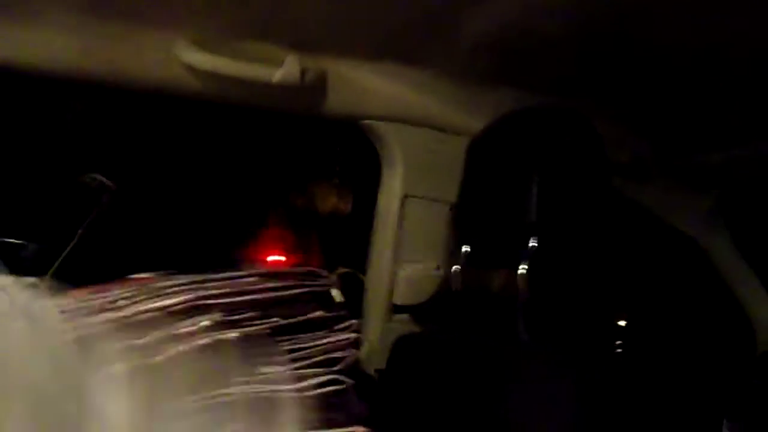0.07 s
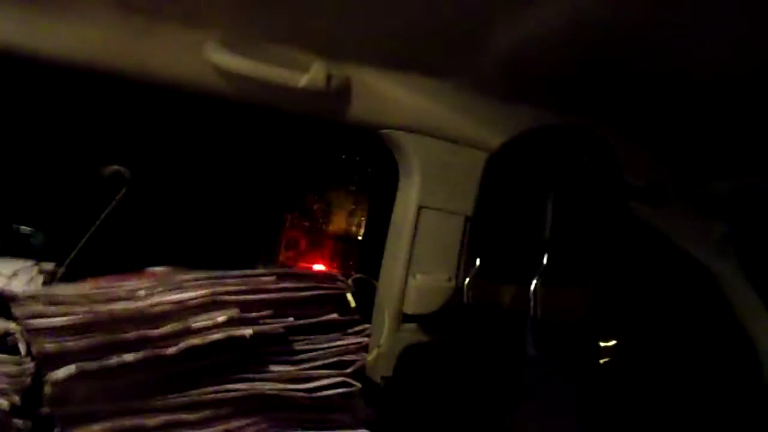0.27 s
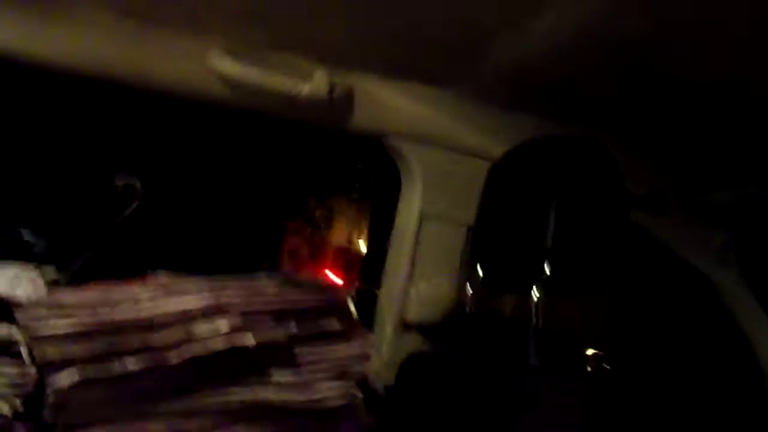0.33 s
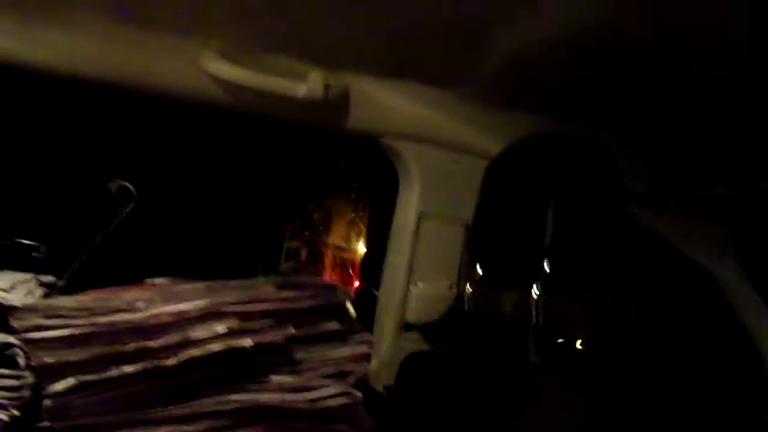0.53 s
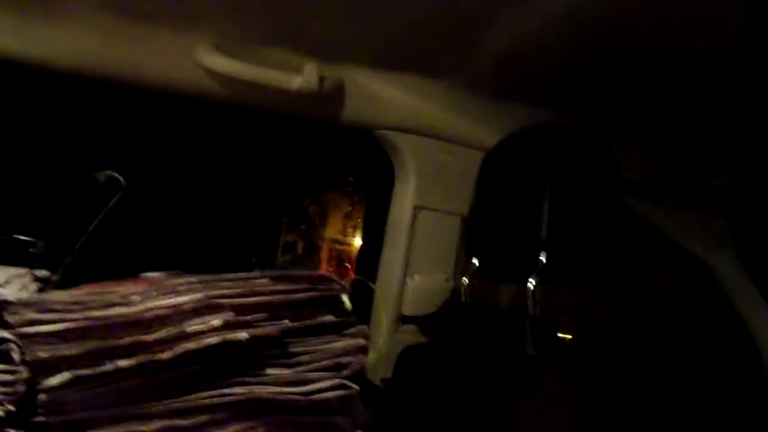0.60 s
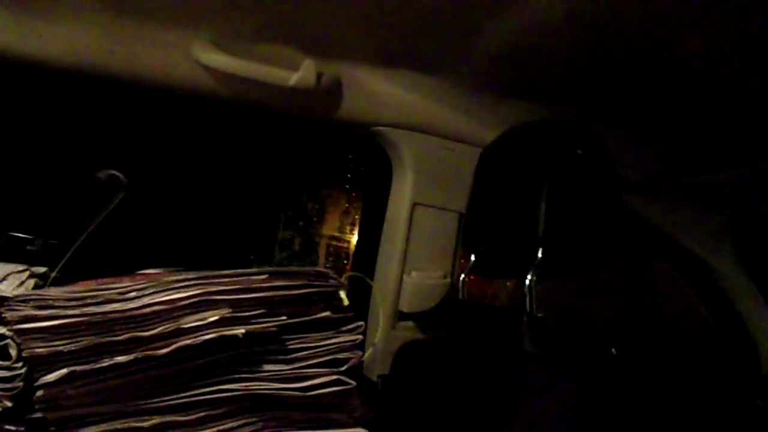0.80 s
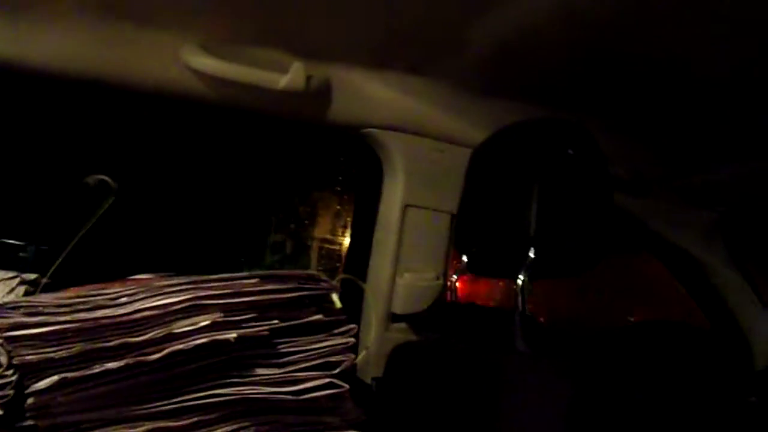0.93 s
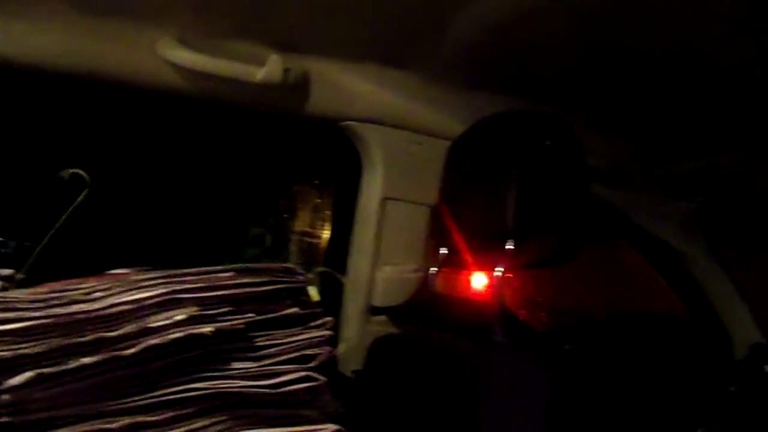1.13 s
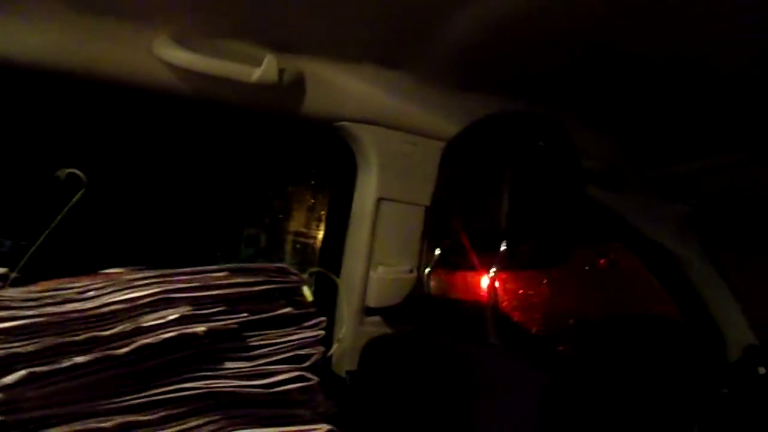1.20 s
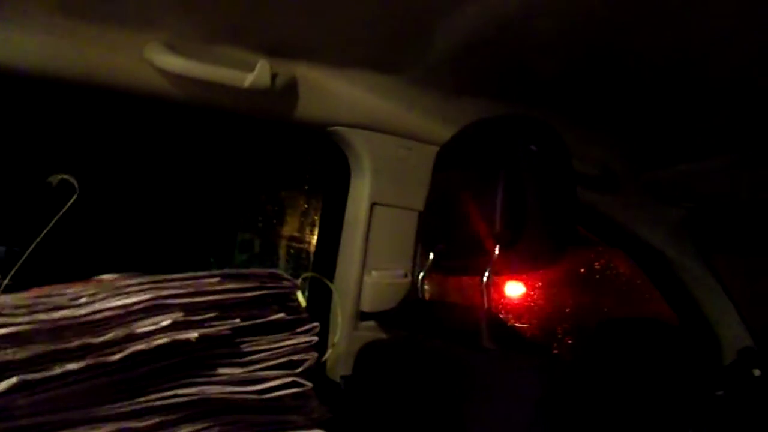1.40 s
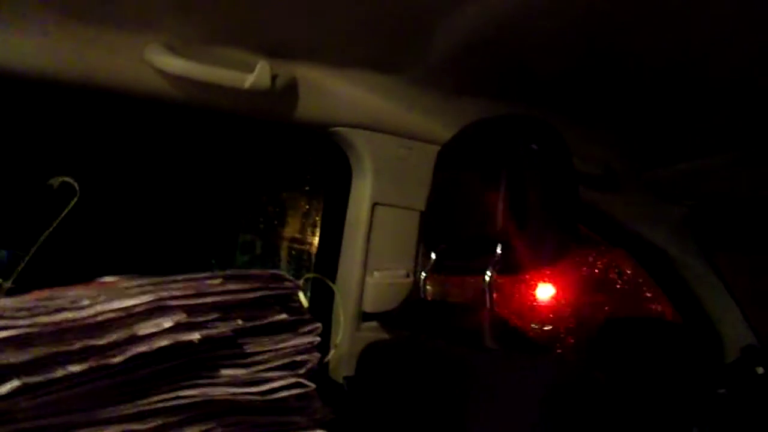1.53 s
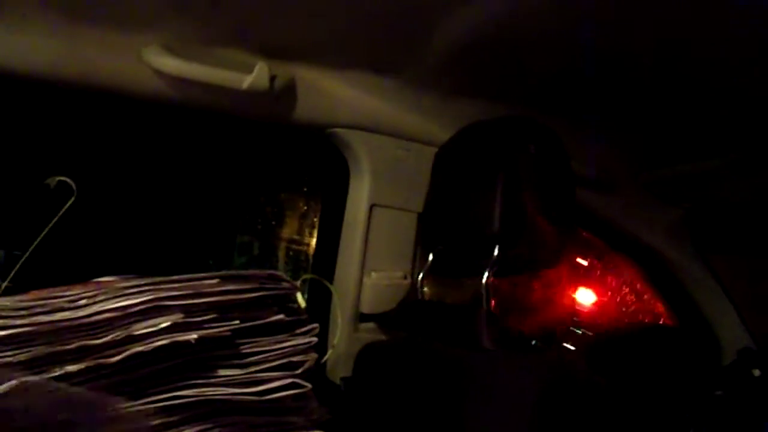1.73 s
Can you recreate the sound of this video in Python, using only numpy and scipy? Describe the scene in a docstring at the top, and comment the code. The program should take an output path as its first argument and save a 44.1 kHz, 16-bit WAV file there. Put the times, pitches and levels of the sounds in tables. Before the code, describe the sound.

Newspapers slap onto a stack, then rustle softly over a faint idling engine.

```python
"""A bundle of newspapers is slapped onto a stack: it skids over the top sheet, cracks down and settles.
Sheets then slide, crinkle and swish, and their folds snap; bending waves in paper carry the treble
first, so every snap is a tiny falling chirp. Underneath, the vehicle's idling engine drones through
the small padded cabin."""
import sys
import numpy as np
from scipy import signal
from scipy.fft import rfft, irfft, next_fast_len
from scipy.io import wavfile
from scipy.ndimage import map_coordinates

SR = 44100
rng = np.random.default_rng(int(sys.argv[2]) if len(sys.argv) > 2 else 0)


def file_out(sig):
    """Save sig as 16-bit WAV at sys.argv[1]."""
    # one column per channel
    cols = np.atleast_2d(sig).T
    # limit, then scale
    lim = np.clip(cols, -1, 1)
    pcm = np.round(lim * 32767).astype(np.int16)
    wavfile.write(sys.argv[1], SR, pcm)


N = 77175
TOP_HZ = 16300  # band limit


def amp(db):
    """Decibels to gain."""
    return 10 ** (np.asarray(db) / 20)


def unit(x):
    """Scale to rms 1."""
    return x / np.sqrt(np.mean(x ** 2) + 1e-20)


def along(points, hz):
    """Read a curve of (f/Hz, value) points on a log frequency axis."""
    f, values = np.transpose(points)
    return np.interp(np.log(hz + 1), np.log(f + 1), values)


def wobble(knots_per_s):
    """A smooth random modulator."""
    return map_coordinates(rng.standard_normal(4096), [np.arange(N) * knots_per_s / SR + 2], mode="wrap")


def equalise(x, eq):
    """Minimum-phase EQ through (f/Hz, gain/dB) points."""
    size = 2 ** 17
    cepstrum = irfft(np.log(amp(along(eq, np.fft.rfftfreq(size, 1 / SR)))))
    cepstrum[1:size // 2] *= 2
    cepstrum[size // 2 + 1:] = 0
    return irfft(rfft(x, size) * np.exp(rfft(cepstrum)))[:N]


def noise(eq):
    """Coloured noise of rms 1."""
    return unit(equalise(rng.standard_normal(N), eq))


# low engine bed and the airy hiss above it: f/Hz, gain/dB
DRONE_EQ = [(20, -37.5), (38, -19.5), (52, -5), (75, -3.5), (130, -4), (200, -11.5), (300, -16.5),
            (600, -22.5), (1200, -42), (3000, -52.5)]
HISS_EQ = [(350, -27), (550, -8.5), (720, -9), (1100, -11.5), (2200, -13), (3500, -14.5), (6500, -21),
           (7800, -19.5), (11000, -18.5), (16000, -26.5)]
# engine and cabin tones: f/Hz, level/dB, level swing/dB, phase swing/rad
HUM_TONES = [(75, -61, 4.5, .9), (107, -59, 4.5, .8), (145, -63.5, 6, 1.2), (241, -62.5, .8, .25)]

def idling_vehicle(whine_hz=7800):
    """The engine drones and hums with wavering tones, under a faint hiss and a narrow whine."""
    t = np.arange(N) / SR
    hum = 0
    for hz, db, swing_db, swing_rad in HUM_TONES:
        swell = amp(swing_db * wobble(11.15))
        phase = 2 * np.pi * hz * t + swing_rad * wobble(7.4)
        hum += amp(db) * unit(swell * np.cos(phase))
    whine = noise([(whine_hz * .93, -60), (whine_hz * .99, 0),
                   (whine_hz * 1.01, 0), (whine_hz * 1.07, -60)])
    return hum + amp(-55) * noise(DRONE_EQ) + amp(-63) * noise(HISS_EQ) + amp(-72) * whine


# decay of the padded cabin: f/Hz, T60/s
CABIN_DECAY = [(200, .12), (1000, 0.036), (4000, 0.083), (14000, 0.036)]

def cabin_tail(early_t60_s=.018, late_db=-7.5):
    """Dense echoes off the near roof and door, then a short padded decay; energy 1."""
    hz, frame_s, spectra = signal.stft(rng.standard_normal(SR // 5), SR, nperseg=128)
    decay = amp(-60 * frame_s / along(CABIN_DECAY, hz)[:, None])
    late = signal.istft(spectra * decay, SR, nperseg=128)[1]
    t = np.arange(len(late)) / SR
    early = rng.standard_normal(len(t)) * amp(-60 * t / early_t60_s)
    tail = (unit(early) + amp(late_db) * unit(late)) * (t > .0007)  # gap before the first echo
    return tail / np.linalg.norm(tail)


# narrow air resonances: f/Hz, width/Hz, gain/dB
AIR_MODES = [(480, 45, -3), (718, 37, 1), (1157, 37, -4), (1720, 26, -9.5), (2510, 89.2, -9.5),
             (3014, 48, -6.5)]

def hollows(paper):
    """Hollows between the stack, door and roof ring along with the paper."""
    size = next_fast_len(N + SR // 2)
    f = np.fft.rfftfreq(size, 1 / SR)
    ring = sum(amp(db) * 1j * f * width / (hz * hz - f * f + 1j * f * width)
               for hz, width, db in AIR_MODES)
    return irfft(rfft(paper, size) * (1 + ring), size)[:N]


def rubbing(strokes, eq, grains_per_s, grain_db, flutter_db):
    """Paper on paper: fine hiss with catching fibres. Strokes rise, hold, then fall 60 dB per release."""
    t = np.arange(N) / SR
    power = 0
    for start, end, db, attack, release in strokes:
        rise = np.clip((t - start) / attack, 0, 1)
        fall_db = 60 * np.maximum(t - end, 0) / release
        power += (rise * amp(db - fall_db)) ** 2
    catches = (rng.random(N) < grains_per_s / SR) * rng.standard_normal(N)
    friction = rng.standard_normal(N) + amp(grain_db) * unit(catches)
    flutter = amp(flutter_db * wobble(90))
    return unit(equalise(friction, eq)) * np.sqrt(power) * flutter


# light brushes: start/s, end/s, level/dB, attack/s, release/s
SWISH_STROKES = [(.125, .175, -56, 0.017, 0.18), (1.17, 1.2, -63, .004, .1), (1.3, 1.46, -63.5, 0.039, .35),
                 (1.545, 1.62, -60.5, 0.0062, .2), (1.712, 1.75, -55.5, .006, .1)]
# all air, no body: f/Hz, gain/dB
SWISH_EQ = [(1500, -25.5), (4000, -2.5), (6500, 0.5), (9000, 0.5), (13000, -3.5), (16000, -8)]

def swishes():
    """Single sheets brush past with an airy swish."""
    return rubbing(SWISH_STROKES, SWISH_EQ, grains_per_s=320, grain_db=-6, flutter_db=4.5)


# soft pushes: start/s, end/s, level/dB, attack/s, release/s
SHOVE_STROKES = [(.335, .39, -52.5, 0.016, 0.051), (.472, .484, -61, .005, 0.036),
                 (.64, .76, -60, 0.017, 0.092), (.765, .8, -57.5, 0.011, .04),
                 (.882, .91, -53, .003, 0.032)]
# muffled mids: f/Hz, gain/dB
SHOVE_EQ = [(60, -14), (250, -7), (480, -9.5), (600, 0), (750, 1.5), (950, -7), (1200, -0.5), (1800, -3),
            (4000, -53.5), (9000, -74.5)]

def shoves():
    """The stack gives with a soft, dull shove."""
    return rubbing(SHOVE_STROKES, SHOVE_EQ, grains_per_s=250, grain_db=-3, flutter_db=3.0)


# long, quiet rubs: start/s, end/s, level/dB, attack/s, release/s
SLIDE_STROKES = [(-.04, .2, -54, .12, 0.23), (.3, .6, -53, 0.018, 0.77), (.58, .885, -54, 0.039, 0.26),
                 (1.17, 1.28, -51.5, 0.052, .12), (1.28, 1.42, -57.5, 0.026, 0.5),
                 (1.55, 1.75, -57, 0.012, .1), (1.645, 1.72, -51.5, 0.0052, 0.22)]
# broad, papery mids: f/Hz, gain/dB
SLIDE_EQ = [(150, -21), (400, 1.5), (750, -2.5), (1000, -2), (1500, 1.5), (3000, 0.5), (4500, 0),
            (5500, -6.5), (9000, -6), (12000, -14), (16000, -17)]

def slides():
    """Sheets slide over each other with a smooth hiss."""
    return rubbing(SLIDE_STROKES, SLIDE_EQ, grains_per_s=350, grain_db=-10, flutter_db=1.44)


# quick crunches: start/s, end/s, level/dB, attack/s, release/s
CRINKLE_STROKES = [(.827, .85, -44.5, 0.0015, 0.016), (.868, .87, -67, .001, 0.017),
                   (1.271, 1.279, -50, 0.0038, 0.14), (1.684, 1.691, -55, 0.0017, 0.036)]
# crisp presence: f/Hz, gain/dB
CRINKLE_EQ = [(150, -20), (450, -5.5), (750, -1), (1000, -4.5), (1500, -2.5), (3200, 1), (5000, -12.5),
              (9000, -3.5), (12000, -15), (16000, -20.5)]

def crinkles():
    """Sheets crumple briefly, more grain than hiss."""
    return rubbing(CRINKLE_STROKES, CRINKLE_EQ, grains_per_s=500, grain_db=3.5, flutter_db=-2.5)


def snap(at_s, db, centre_hz, octaves, travel_ms, skirt_db, room_db, ripple_db=1.5):
    """A click spreads into a falling chirp, as bending waves speed up with the root of frequency."""
    f = np.fft.rfftfreq(4096, 1 / SR) + 1
    octaves_off = np.log2(f / centre_hz)
    peak = np.exp(-.5 * (octaves_off / octaves) ** 2)
    skirt = amp(skirt_db) / (1 + ((octaves_off + .7) / 2) ** 4)  # duller body under the peak
    # every fold favours its own frequencies
    ripple = amp(ripple_db * map_coordinates(rng.standard_normal(64), [f / 450]))
    phase = 2 * np.pi * travel_ms / 1000 * (2 * np.sqrt(1000 * f) - f * np.sqrt(1000 / TOP_HZ))
    lead_samples = 64
    chirp = np.roll(irfft((peak + skirt) * ripple * np.exp(-1j * phase)), lead_samples)
    chirp *= amp(db) / np.abs(chirp).max()
    sound = amp(room_db) * signal.fftconvolve(chirp, cabin_tail())
    sound[:len(chirp)] += chirp
    return np.pad(sound, (max(round(at_s * SR) - lead_samples, 0), N))[:N]


# ticks and cracks of the folds, plus the bundle's treble crack at .2856 s: t/s, level/dB, f/Hz, width/octaves,
# travel time at 1 kHz/ms
FOLD_SNAPS = [(0.1296, -41, 3480, 1.5, 2.8), (.1365, -40.5, 1010, 1.2, 3), (0.167, -36, 3000, 0.73, 2.6),
              (.2322, -23.5, 3730, 0.51, 2.7), (.2642, -30, 12500, 0.33, 1.2),
              (.2856, -5.5, 10560, 0.15, 0.96), (0.2886, -10, 3050, .55, 2.22),
              (0.3009, -12.5, 9300, 0.26, 2.9), (.3012, -17, 4160, .5, 1.54),
              (0.302, -18.5, 2350, 0.74, 3.5), (0.3561, -36.5, 3950, 1.1, 3), (.4795, -41, 1170, 1.3, 5.4),
              (0.594, -36.5, 2340, 0.58, 3), (.609, -40.5, 4500, 1.2, 2), (.7645, -35, 4130, 0.47, 2.8),
              (0.7966, -24, 2780, 0.46, 4.7), (.7985, -30.5, 1270, 0.3, 2.4),
              (.8277, -31.5, 3460, 1.14, 3.1), (0.8414, -27.5, 2980, 0.51, 1.8),
              (0.8437, -30, 1520, 0.55, 3.4), (0.8486, -32.5, 2100, 0.36, 3.6),
              (0.8838, -31, 2160, 0.71, 4), (.9, -29, 3310, 1.3, 4), (1.0778, -44, 2280, 0.52, 2.8),
              (1.104, -50, 4930, 2.2, 2), (1.169, -48, 1500, 1, 3), (1.2271, -32, 3600, 0.58, 2),
              (1.2326, -18.5, 5280, 0.46, 2.5), (1.2329, -20.5, 13800, 0.31, 1),
              (1.2338, -24.5, 2240, 0.34, 1.85), (1.2519, -35, 3800, .5, 1.3),
              (1.2623, -34.5, 3400, 0.42, 1.8), (1.2719, -35.5, 4630, 0.98, 4.6),
              (1.275, -38.5, 1770, 1.5, 3.5), (1.542, -47.5, 2700, 0.49, 3.8),
              (1.571, -40, 3180, 1.25, 5.2), (1.647, -36, 3800, 1, 4), (1.6638, -31, 3750, 0.87, 3),
              (1.6835, -30.5, 2230, 0.97, 4), (1.6882, -31, 1610, 0.47, 2.4)]

def fold_snaps():
    """Folds snap, each with its own short cabin echo; among them, the loud narrow crack at .2856 s is the
    bundle's treble crack as it lands."""
    return sum(snap(*fold, skirt_db=-27, room_db=-5.5) for fold in FOLD_SNAPS)


# scuffs around the landing: start/s, end/s, level/dB, attack/s, release/s
SKID_STROKES = [(.13, .218, -47.5, 0.055, .03), (.216, .24, -34, 0.0028, 0.036),
                (.226, .284, -33.5, 0.0065, .02), (.277, .285, -22.5, 0.01, 0.015),
                (.352, .378, -48, .005, 0.04)]
# full-bodied scrape: f/Hz, gain/dB
SKID_EQ = [(70, -23.5), (130, -5), (280, 0), (480, -1.5), (600, -7), (780, -2), (950, -5.5), (1700, -2.5),
           (3000, -5.5), (4200, -2), (5400, -11.5), (8500, -11), (11000, -16), (16000, -24)]

def bundle_skid():
    """The bundle skids over the top sheet of the stack."""
    return rubbing(SKID_STROKES, SKID_EQ, grains_per_s=1500, grain_db=-5, flutter_db=1.7)


# puffs that give the slap its body: start/s, end/s, level/dB, attack/s, release/s
FLOP_STROKES = [(.2835, .29, -22.5, .003, 0.053), (.296, .304, -21.5, .004, 0.021),
                (.308, .318, -39, .004, .1)]
# midrange smack: f/Hz, gain/dB
FLOP_EQ = [(60, -31.5), (150, -15.5), (280, -12), (500, -1.5), (800, -3.5), (1100, -10), (1750, 2.5),
           (2150, -2.5), (2900, -3), (4300, -9), (5300, -13), (8500, -16), (11000, -25.5), (16000, -20)]

def bundle_slap():
    """The bundle cracks as it lands flat; its pages collapse and push the air out."""
    flop = rubbing(FLOP_STROKES, FLOP_EQ, grains_per_s=1500, grain_db=-0.5, flutter_db=0.5)
    crack = snap(at_s=.2848, db=0.5, centre_hz=3590, octaves=0.43, travel_ms=3.9,
                 skirt_db=-29.5, room_db=-11.5)
    return flop + crack


def scene(paper_trim_db=-1.44):
    """Mono mix: all the paper goes through the hollows and one trim, over the engine bed."""
    bundle = bundle_skid() + bundle_slap()
    sheets = slides() + crinkles() + shoves() + swishes() + fold_snaps()
    return (amp(paper_trim_db) * hollows(bundle + sheets) + idling_vehicle())[None]


# microphone port response: f/Hz, gain/dB
MIC_EQ = [(20, 0.5), (3300, 0), (3400, -10), (3500, 2.5), (5200, -1.5), (6700, 2.5), (7000, -2.5),
          (7250, -10), (7600, -6), (8300, -2), (9200, -3), (10000, -12.5), (10700, -16), (11700, -6),
          (13200, -1.5), (14500, -5.5), (15400, 3), (16500, -17)]

def record(dry):
    """The microphone port notches the treble; nothing is kept above the band limit."""
    size = next_fast_len(N + SR // 2)
    notched = equalise(dry[0], MIC_EQ)
    passband = np.fft.rfftfreq(size, 1 / SR) < TOP_HZ
    return irfft(rfft(notched, size) * passband, size)[None, :N]


dry = scene()
out = record(dry)
file_out(out)
```